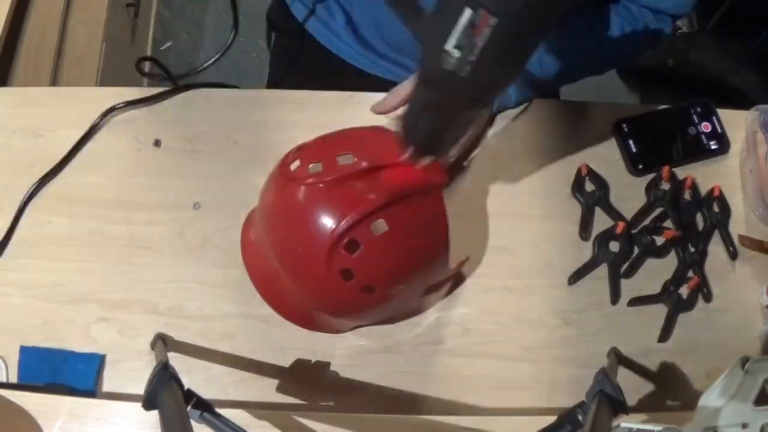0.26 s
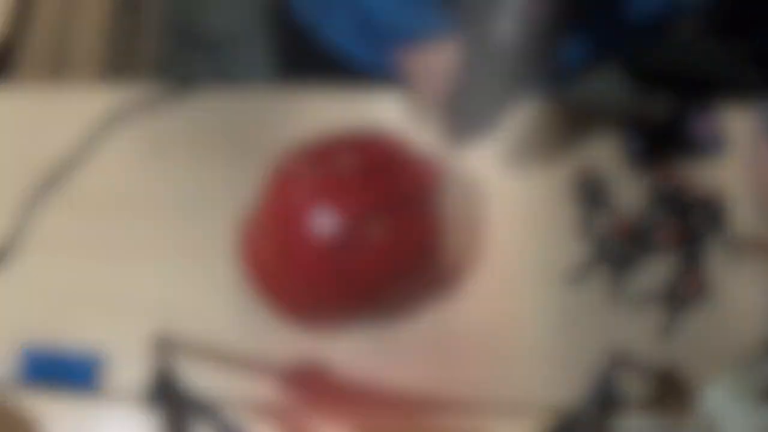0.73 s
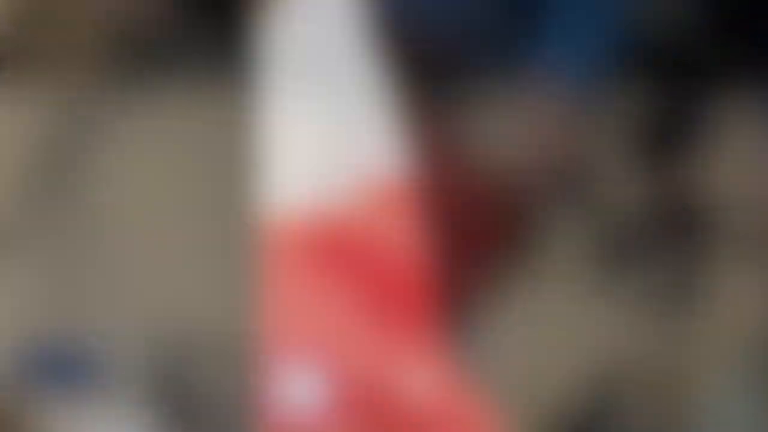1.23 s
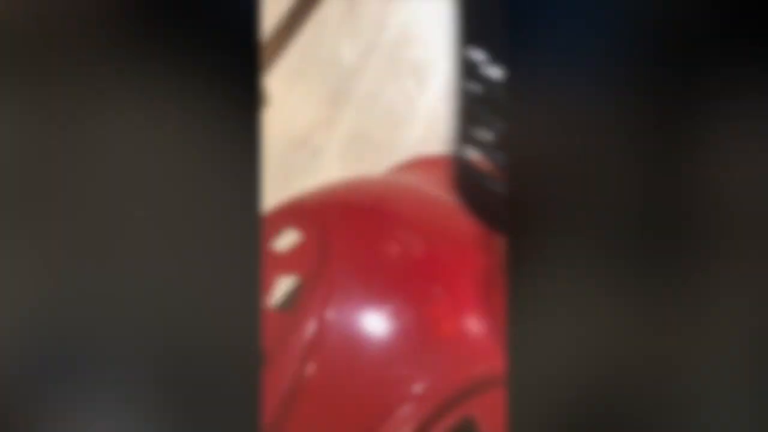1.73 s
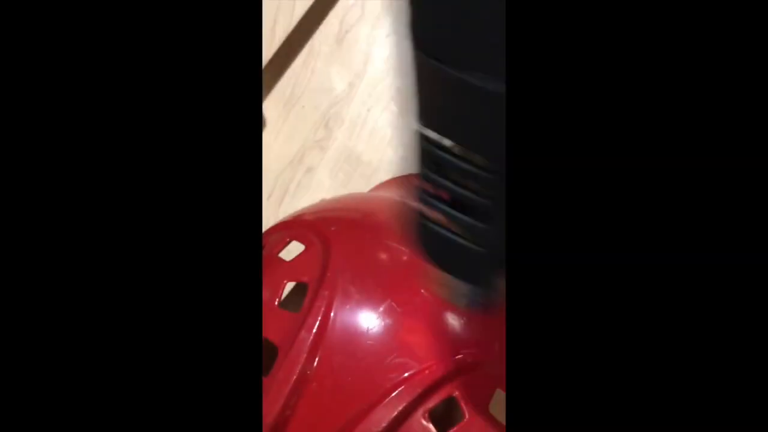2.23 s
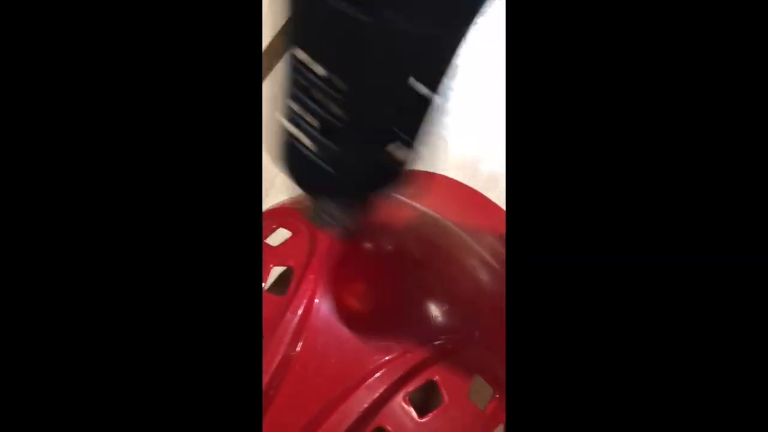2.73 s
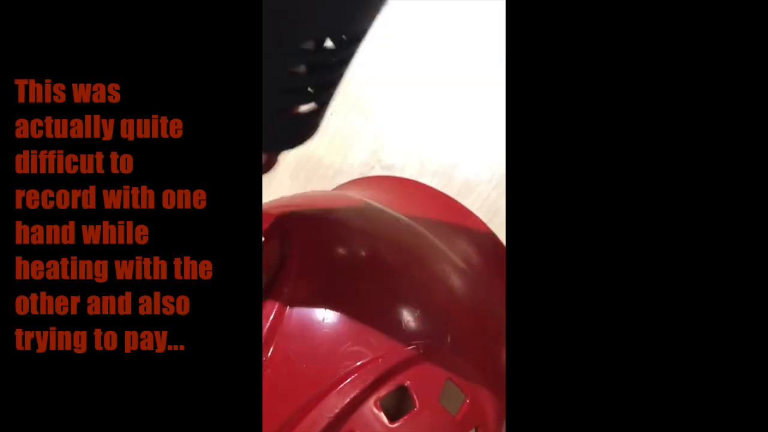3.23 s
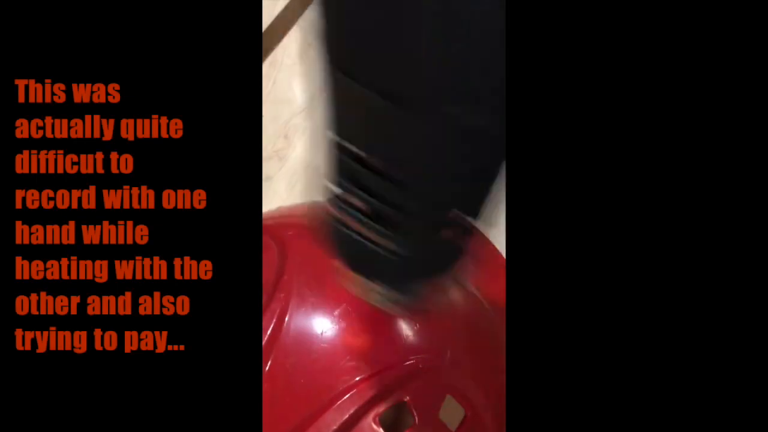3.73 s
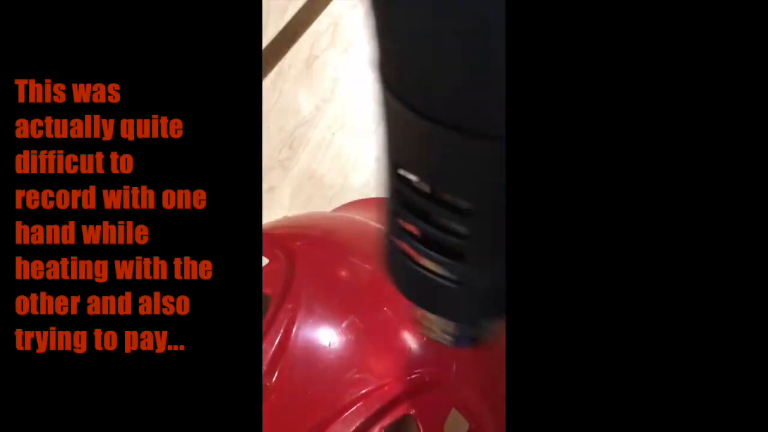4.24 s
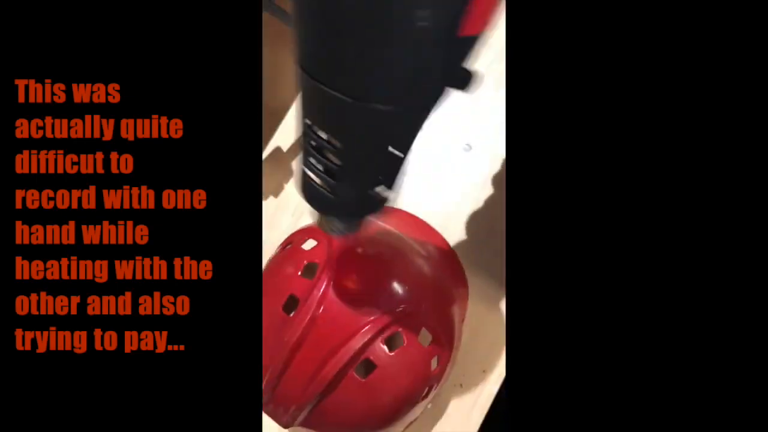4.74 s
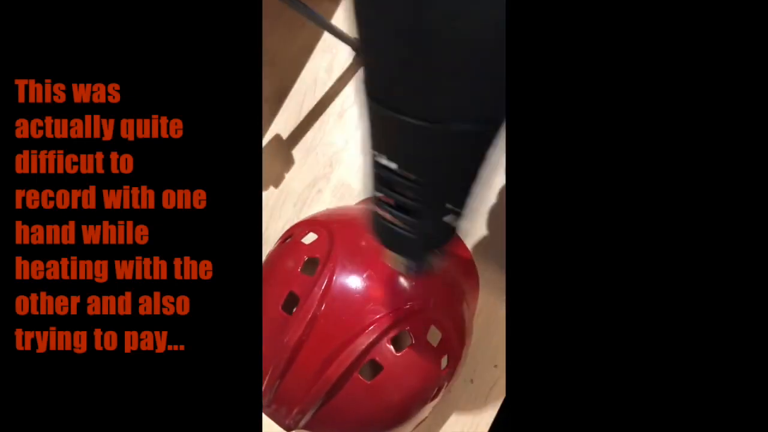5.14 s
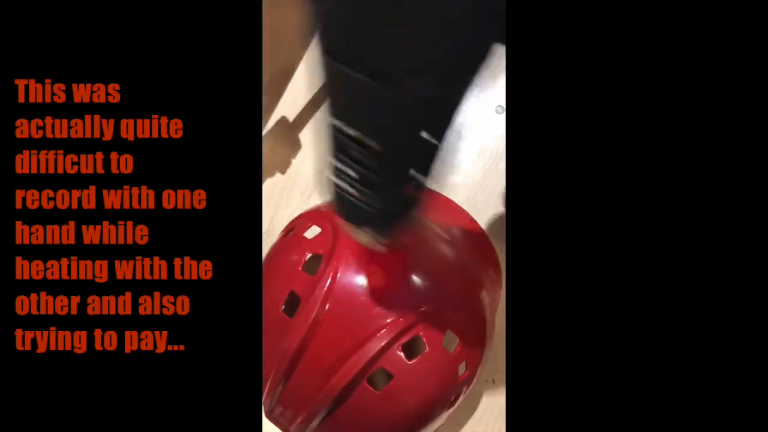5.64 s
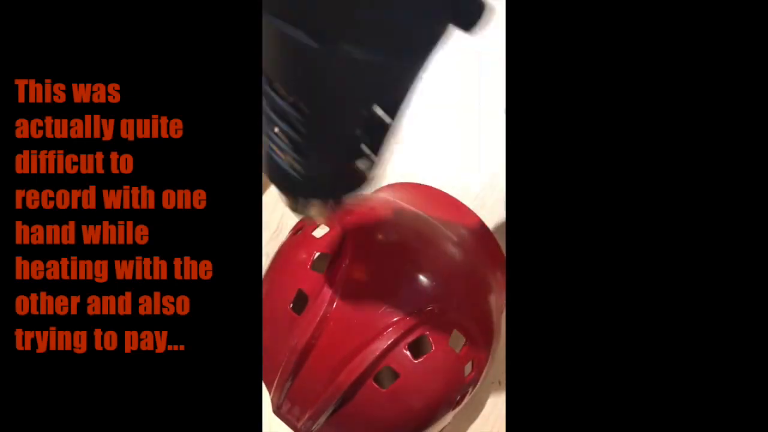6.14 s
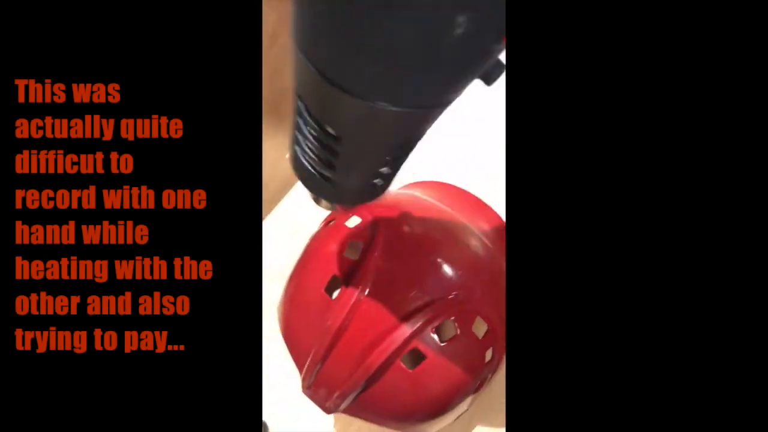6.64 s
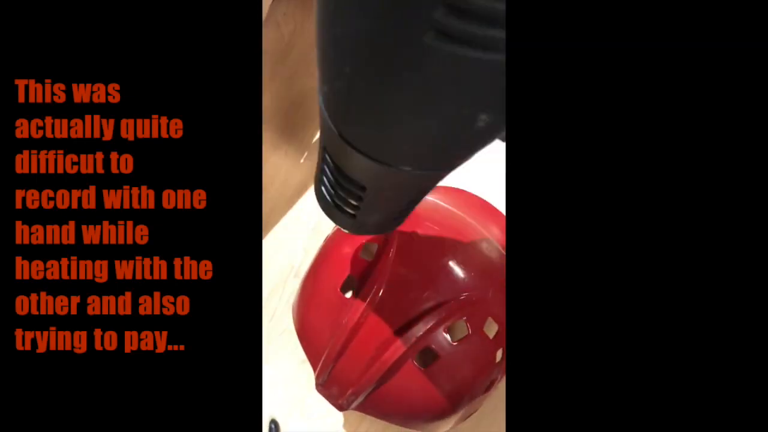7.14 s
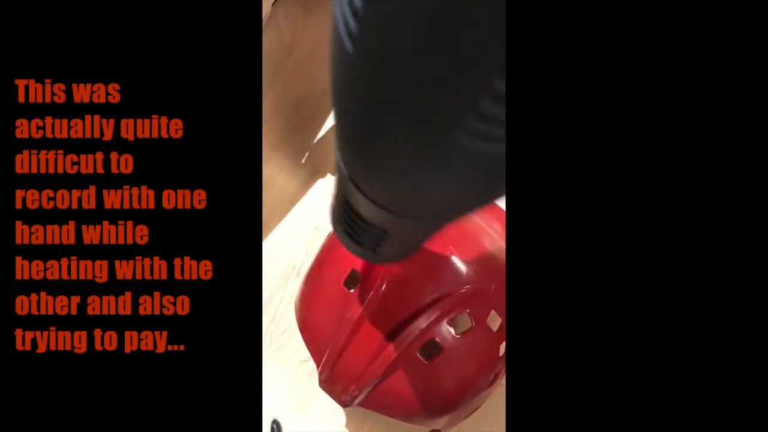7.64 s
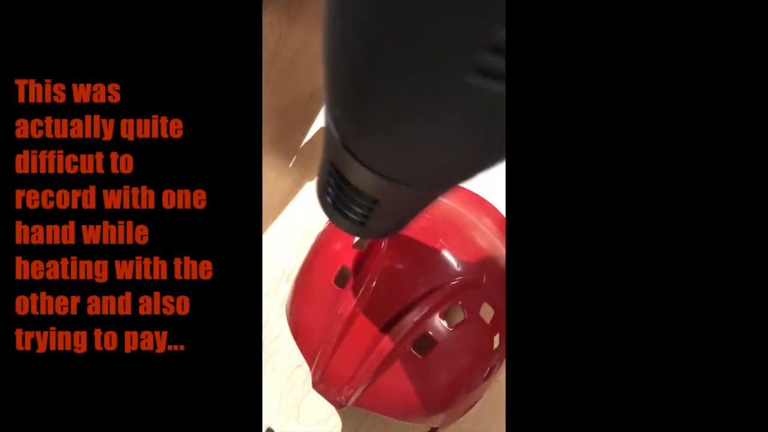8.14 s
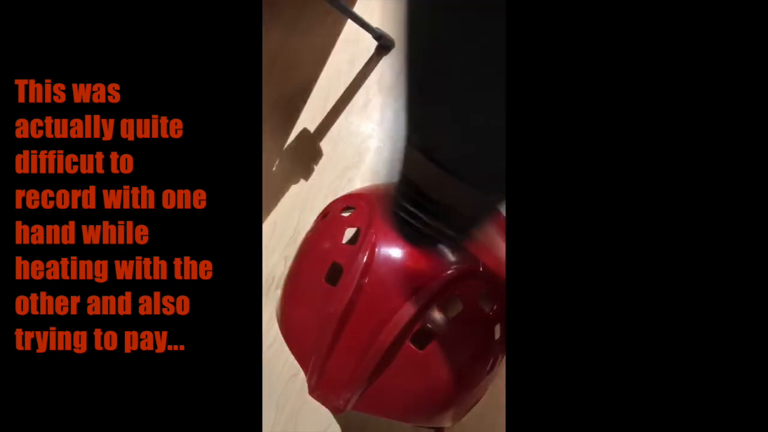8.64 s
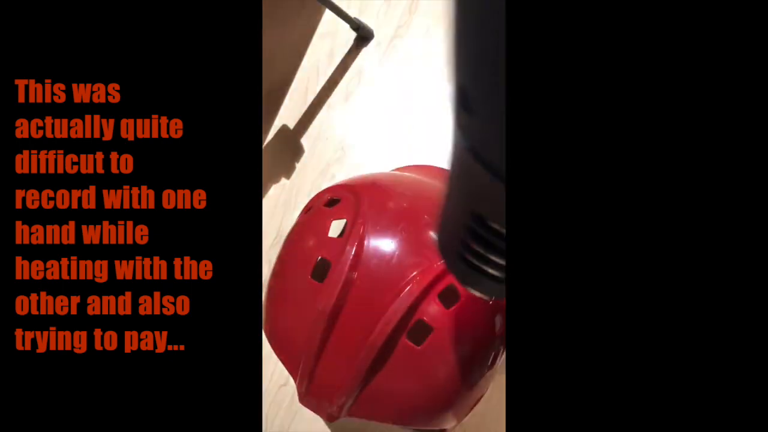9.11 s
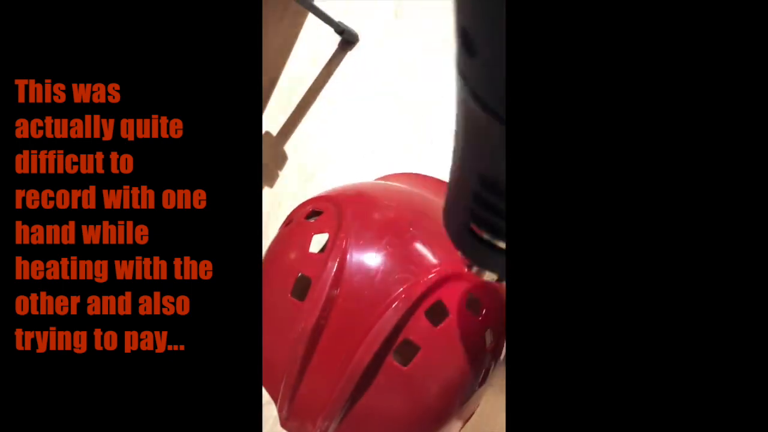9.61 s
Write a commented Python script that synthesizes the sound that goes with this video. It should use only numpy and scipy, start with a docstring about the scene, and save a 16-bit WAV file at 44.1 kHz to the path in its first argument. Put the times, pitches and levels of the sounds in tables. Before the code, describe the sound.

After a thin hiss and a few light plastic ticks, a heat gun fades in, blowing and humming close by.

```python
"""Heat gun over a plastic shell

A heat gun is swept to and fro over a plastic shell on a workbench, close to the microphone.
Its fan motor hums and whines on multiples of the shaft speed; air roars through the barrel and
hisses at the vents. A thin, high hiss and a few ticks come first; the hiss fades as the gun fades in."""
import sys
import numpy as np
from scipy import signal
from scipy.fft import rfft, irfft
from scipy.io import wavfile
from scipy.ndimage import uniform_filter1d

SR = 44100
rng = np.random.default_rng(int(sys.argv[2]) if len(sys.argv) > 2 else 0)


def to_wav(s):
    """Save 16-bit WAV."""
    ch = np.atleast_2d(s).T  # columns
    pcm = np.round(np.clip(ch, -1, 1) * 32767)  # PCM
    wavfile.write(sys.argv[1], SR, pcm.astype(np.int16))


N = 435266
FFT_SIZE, HOP = 2048, 256
T = np.arange(N) / SR
FRAME_T = np.arange(N // HOP + 10) * HOP / SR
BIN_HZ = np.fft.rfftfreq(FFT_SIZE, 1 / SR)
GUN_START_S = 0.43


def amp(db):
    """Decibels to gain."""
    return 10 ** (np.asarray(db) / 20)


def curve(rows, t, column=1):
    """One column of a time table, joined by straight lines."""
    rows = np.array(rows, float)
    return np.interp(t, rows[:, 0], rows[:, column])


def spectrum(rows, hz, column=1):
    """One column of a frequency table, joined on a log axis."""
    rows = np.array(rows, float)
    return np.interp(np.log(hz + 1), np.log(rows[:, 0]), rows[:, column])


def bells_db(rows, column=2):
    """Sum of bell-shaped peaks over the bins."""
    return sum(row[column] * 2 ** -((2 * (BIN_HZ - row[0]) / row[1]) ** 2) for row in rows)


def wander(t, top_hz):
    """Smooth random drift of unit rms."""
    rates_hz = np.geomspace(top_hz / 10, top_hz, 20)
    return sum(np.sin(2 * np.pi * (hz * t + rng.random())) for hz in rates_hz) / np.sqrt(10)


def shaped_noise(field_db):
    """Noise whose power per Hz follows a frames x bins field."""
    white = rng.standard_normal(len(FRAME_T) * HOP) * np.sqrt(SR / 2)
    framing = dict(nperseg=FFT_SIZE, noverlap=FFT_SIZE - HOP)
    frames = signal.stft(white, **framing)[2][:, :len(FRAME_T)]
    return signal.istft(frames * amp(field_db).T, **framing)[1][:N]


def ramp(start_s, end_s):
    """Linear fade from 0 to 1."""
    return np.clip((T - start_s) / (end_s - start_s), 0, 1)


def thin_hiss(flicker_db=0.25, fade_s=(0.48, 1.6)):
    """A high hiss with fuzzy whistles and a steady-pitched whine, fading away."""
    # Each row: frequency in Hz, density in dB per Hz.
    density = [(30, -104), (200, -99), (700, -99), (1400, -93), (2200, -96), (4200, -94), (6000, -97),
               (7000, -94), (8900, -92.5), (9500, -88), (10900, -84), (11800, -89.5), (12600, -84),
               (15500, -85)]
    # Each row: centre in Hz, width in Hz, lift in dB.
    whistles = [(6700, 200, 4), (8270, 120, 4), (12225, 130, 6.5), (14935, 150, 6)]
    # Each row: frequency in Hz, rms level in dB.
    whine_tones = [(2756, -68.5), (5512, -70.5), (8268, -72), (11024, -64), (13778, -59.5)]
    # Each row: frequency in Hz, side minus mid in dB.
    stereo_width = [(60, -9), (110, -8), (200, -14), (380, -12), (700, -15), (1290, -26), (2380, -39),
                    (4400, -38), (8120, -22), (15000, -23)]
    field_db = spectrum(density, BIN_HZ) + bells_db(whistles) + flicker_db * wander(FRAME_T, 12)[:, None]
    whine = np.zeros(N)
    for hz, db in whine_tones:
        rms = np.interp(T, FRAME_T, amp(db + wander(FRAME_T, 15)))
        whine += np.sqrt(2) * rms * np.sin(2 * np.pi * (hz * T + rng.random()))
    mid = shaped_noise(field_db) + whine
    side = shaped_noise(field_db + spectrum(stereo_width, BIN_HZ))
    return np.array([mid + side, mid - side]) * (1 - ramp(*fade_s))


def shell_ticks(side_db=-7):
    """Short dry scrapes ring the handled plastic shell."""
    # Each row: start in seconds, rms level in dB, length in seconds, centre in Hz, width in octaves.
    scrapes = [(0.2130, -46, .002, 4500, 1.0), (0.2185, -45.5, .007, 6500, .35),
               (0.2425, -41.5, .006, 2200, .75), (0.4725, -39.5, .0065, 4800, .9)]
    # Each row: centre in Hz, width in Hz, lift in dB.
    shell_modes = [(1910, 280, 12), (2880, 410, 4.5), (3600, 450, 9), (5550, 810, 6), (6850, 490, 10),
                   (8100, 830, 4)]
    out = np.zeros((2, N))
    for start_s, db, length_s, centre_hz, octaves in scrapes:
        start, length = round(start_s * SR), round(length_s * SR)
        band = np.exp(-(np.log2((BIN_HZ + 1) / centre_hz) / octaves) ** 2 / 2)
        white = rfft(rng.standard_normal((2, FFT_SIZE)))
        burst = irfft(amp(bells_db(shell_modes)) * band * white)[:, :length]
        burst *= amp(db) / burst.std() * signal.windows.tukey(length, 0.3)
        out[:, start:start + length] += burst
    mid, side = out[0], amp(side_db) * out[1]
    return np.array([mid + side, mid - side])


def position_shares():
    """Weights of the gun's far, middle and near sound in each frame."""
    # Each row: time in seconds, position (0 far, 1 middle, 2 near with vents to the microphone).
    path = [(1.5, 0), (4.4, 0.05), (5.5, .5), (6.2, .8), (6.6, 1.15), (7.25, 2), (8.4, 2), (8.8, 1.0),
            (9.8, .95)]
    return np.maximum(1 - abs(curve(path, FRAME_T)[:, None] - np.arange(3)), 0)


def sweep_angle(t, first_stroke_s=0.2):
    """Phase of the hand's to-and-fro: cosine is speed towards the microphone, sine is closeness."""
    # Each row: start in seconds, strokes per second.
    pace = [(0, 3.774), (2.85, 3.636), (4.5, 4.55), (4.94, 3.76), (6.8, 4.03), (8.29, 3.66), (9.11, 4.11)]
    starts_s, rates_hz = np.transpose(pace)
    stroke_hz = rates_hz[np.searchsorted(starts_s, FRAME_T, "right") - 1]
    strokes = np.cumsum(stroke_hz) * HOP / SR
    return 2 * np.pi * (np.interp(t, FRAME_T, strokes) - np.interp(first_stroke_s, FRAME_T, strokes))


def swept_beam(fine_db=0.78, fine_full_hz=3500):
    """Frames x bins swing in dB: each stroke carries broad lobes and fine ripple past the microphone."""
    # Each row: centre in Hz, width in Hz, lag in radians, far, middle and near swing in dB at reach 1.
    lobes = [(1140, 750, 0.35, 0, 0.53, 0.5), (2120, 400, 0.27, 1.7, 0.89, 1),
             (2870, 180, 0.1, 3.5, 1.2, 2.7), (4570, 710, 0.03, -0.3, -1.2, -2.5),
             (5920, 420, 0, 2.1, -1.5, -0.5), (7740, 870, 0.15, 0.1, -1.1, -1.5),
             (9070, 740, 0.6, 1.3, -1.5, -2)]
    # Each row: time in seconds, stroke reach as a factor on the lobes' swing.
    reach = [(1.6, .4), (2.2, 1.2), (8.2, 1.2), (9.0, 1.3)]
    # Colour of the gun held off to one side. Each row: centre in Hz, width in Hz, lift in dB.
    aside_colour = [(456, 210, -1), (1950, 480, 4), (2820, 1200, -1.5), (6000, 2800, -2),
                    (9200, 1300, -3.5)]
    # Each row: time in seconds, share of that colour from 0 to 1.
    aside_share = [(1.7, 1), (2.2, 0.04)]
    angle, shares = sweep_angle(FRAME_T)[:, None], position_shares()
    broad_db = 0
    for lobe in lobes:
        depths_db = np.array([bells_db([lobe], column) for column in (3, 4, 5)])
        broad_db += shares @ depths_db * np.sin(angle - lobe[2])
    broad_db *= curve(reach, FRAME_T)[:, None]
    ripple = uniform_filter1d(uniform_filter1d(rng.standard_normal((2, len(BIN_HZ))), 12), 8)
    ripple *= fine_db / ripple.std()
    ripple *= np.minimum(BIN_HZ / fine_full_hz, 1) ** 2  # long waves spread evenly
    ripple_db = ripple[0] * np.sin(angle) + 0.5 * ripple[1] * np.cos(angle)
    aside_db = np.outer(curve(aside_share, FRAME_T), bells_db(aside_colour))
    return broad_db + ripple_db + aside_db


def air_levels(approach_s=0.81, arrive_s=1.6, rise_db_per_s=9.5, swing_db=2, lag_s=0.042):
    """Roar and hiss levels in dB: both grow as the gun closes in, the jet swinging on and off the shell."""
    roar_db, hiss_db = (-44, -41, -39), (-46.5, -45.5, -43.5)  # far, middle, near
    swell_db, gust_db, gust_hz = 0.2, 0.26, 9.2
    shares = position_shares()
    left_s = arrive_s - np.clip(FRAME_T, approach_s, arrive_s)
    on_the_way = np.sqrt(abs(np.sin(np.pi * left_s / (arrive_s - approach_s))))
    arrival_db = swing_db * on_the_way * np.sin(sweep_angle(FRAME_T - lag_s)) - rise_db_per_s * left_s
    # the roar swells once a stroke as the jet crosses the shell
    waver_db = swell_db * np.sin(sweep_angle(FRAME_T)) + gust_db * wander(FRAME_T, gust_hz)
    return shares @ roar_db + arrival_db + waver_db, shares @ hiss_db + arrival_db


def air_jet(beam_db, split_hz=2200, eddy_db=1.0, flicker_db=0.23, fade_end_s=1.0):
    """Turbulence rings the barrel: a roar below the split, a hiss above it."""
    # Each row: frequency in Hz, far, middle and near density in dB per Hz relative to the air levels.
    turbulence = [(20, -76, -74, -77), (55, -55, -55.5, -57), (148, -41, -43, -45.5),
                  (403, -42, -42.5, -42.5), (620, -37.5, -39, -40), (1410, -35.5, -37.5, -34.5),
                  (1930, -38, -35.5, -43), (2830, -41, -36.5, -36.5), (5120, -43.5, -43.5, -42),
                  (6220, -39, -39, -38.5), (6700, -43.5, -41, -44), (9400, -44.5, -44, -43),
                  (11900, -47, -47, -48), (15500, -48.5, -48, -49)]
    # Each row: centre in Hz, width in Hz, far, middle and near lift in dB.
    barrel_modes = [(836, 258, 7, 8.3, 7.5), (1146, 405, 9.5, 10, 9), (2290, 260, 9, 9.3, 9),
                    (2592, 200, 10.5, 3.5, 1.5), (3510, 310, 6, 2.9, -1), (4054, 340, 9.5, 8.2, 8.5),
                    (4362, 347, 10, 6.3, 4.5), (5600, 310, 3.5, 5, -3)]
    colours_db = [spectrum(turbulence, BIN_HZ, k + 1) + bells_db(barrel_modes, k + 2) for k in range(3)]
    hiss_share = BIN_HZ ** 4 / (BIN_HZ ** 4 + split_hz ** 4)
    roar_db, hiss_db = air_levels()
    field_db = position_shares() @ np.array(colours_db) + beam_db
    field_db += np.outer(roar_db, 1 - hiss_share) + np.outer(hiss_db, hiss_share)
    # eddies briefly lift patches of the spectrum
    eddies = uniform_filter1d(rng.standard_normal(field_db.shape), 14, axis=0)
    eddies = uniform_filter1d(eddies, 22, axis=1)
    field_db += eddy_db * eddies / eddies.std() + flicker_db * wander(FRAME_T, 25)[:, None]
    return shaped_noise(field_db) * ramp(GUN_START_S, fade_end_s)


def fan_motor(beam_db, beaming=1.8, echo_gain=0.27, jitter_hz=0.1, flutter_db=0.92, scatter_rad=1.67):
    """Fan and brushes repeat once a turn; the Doppler-shifted direct sound beats with the bench echo."""
    # Each row: time in seconds, shaft speed in Hz, Doppler swing of the fundamental in Hz.
    running = [(0.5, 207.6, .5), (3.3, 207.65, .6), (4.9, 207.8, .27), (6.2, 207.95, .4), (7.8, 208.1, .3),
               (9.0, 208.3, .25), (9.8, 208.3, .25)]
    # Each row: multiple of the shaft speed, far, middle and near rms level in dB.
    tones = [(1, -56, -51.5, -51), (2, -73, -74, -69), (3, -58, -59, -60), (4, -55, -53, -53),
             (5, -52, -50, -49), (6, -46, -46.5, -45), (7, -56, -55, -57), (8, -61, -59, -54),
             (9, -61, -54, -57), (10, -64, -54, -61), (11, -53, -47, -50), (12, -48, -47.5, -54),
             (13, -58, -56, -53), (15, -70, -65, -61), (16, -64, -63, -70), (18, -70, -69, -62),
             (19, -78, -62, -61), (21, -67, -60, -60), (22, -69, -65, -58), (24, -68, -64, -65),
             (25, -66, -64, -65), (30, -65, -64, -62), (35, -57.5, -58, -66), (36, -70, -64, -65),
             (37, -65, -64, -64), (43, -69, -65, -63), (44, -60.5, -63, -61), (45, -62, -69, -64),
             (47, -64, -67, -63), (49, -71, -69, -63), (51, -60, -58, -68)]
    # All other multiples. Each row: frequency in Hz, far, middle and near rms level in dB.
    brush_buzz = [(3000, -67, -68, -68), (6500, -70, -73.5, -66.5), (7660, -65.5, -69.5, -71),
                  (11000, -85, -72.5, -67), (15500, -73, -74, -72)]
    shaft_hz = curve(running, FRAME_T) + jitter_hz * wander(FRAME_T, 20)
    shaft_rad = 2 * np.pi * np.cumsum(np.interp(T, FRAME_T, shaft_hz)) / SR
    doppler_hz = curve(running, FRAME_T, column=2) * np.cos(sweep_angle(FRAME_T))
    doppler_rad = 2 * np.pi * np.cumsum(doppler_hz) * HOP / SR
    shares = position_shares()
    listed_db = {round(k): levels for k, *levels in tones}
    turn, carrier, out = np.exp(1j * shaft_rad), np.ones(N, complex), np.zeros(N)
    for k in range(1, 76):
        hz = k * shaft_hz.mean()
        levels_db = listed_db.get(k, [spectrum(brush_buzz, hz, column) for column in (1, 2, 3)])
        tone_db = shares @ levels_db + beaming * beam_db[:, np.searchsorted(BIN_HZ, hz)]
        # uneven inflow shakes the upper tones more than the hum
        tone_db += flutter_db * np.tanh(hz / 1000) * wander(FRAME_T, 18)
        paths = np.exp(1j * k * doppler_rad) + echo_gain * np.exp(2j * np.pi * rng.random())
        paths /= np.sqrt(np.mean(abs(paths) ** 2))
        # partly aligned phases leave a faint rasp at the turning rate
        phasor = amp(tone_db) * paths * np.exp(1j * scatter_rad * rng.standard_normal())
        carrier *= turn
        out += (np.interp(T, FRAME_T, phasor) * carrier).real
    return np.sqrt(2) * out * ramp(GUN_START_S, end_s=1.59) ** 1.13


def scene():
    """The gun sits in the centre; the opening hiss and ticks are a little wider."""
    beam_db = swept_beam()
    gun = air_jet(beam_db) + fan_motor(beam_db)
    return gun + shell_ticks() + thin_hiss()


def record(dry):
    """Steep low-pass on the top treble."""
    cutoff_hz = 15780
    lowpass = signal.firwin(1023, cutoff_hz, window=("kaiser", 9), fs=SR)
    return signal.oaconvolve(dry, lowpass[None], "same", axes=1)


dry = scene()
out = record(dry)
to_wav(out)
```